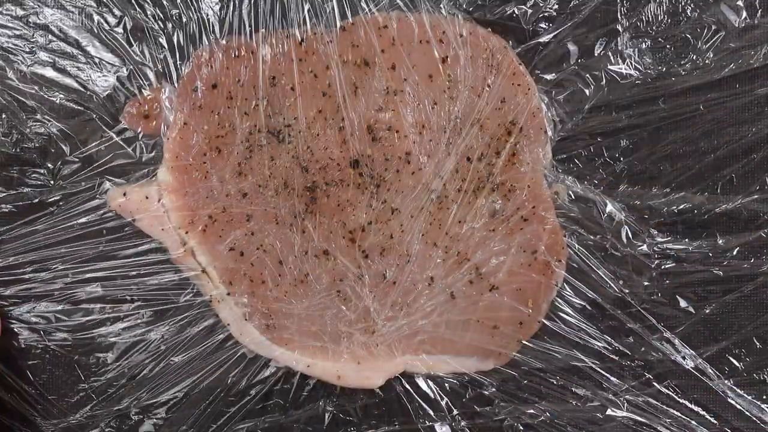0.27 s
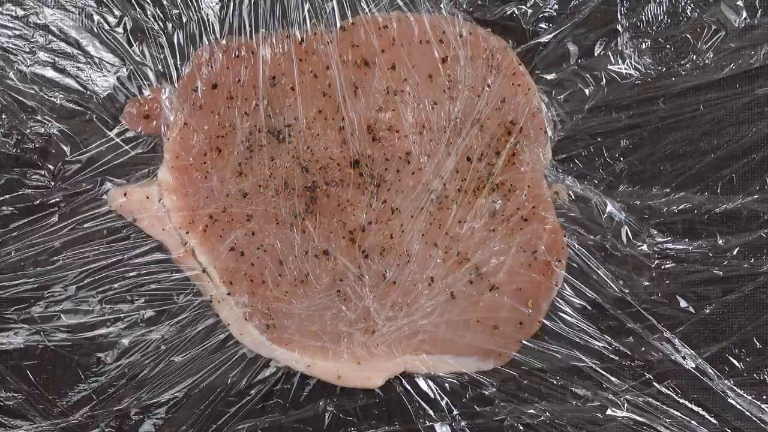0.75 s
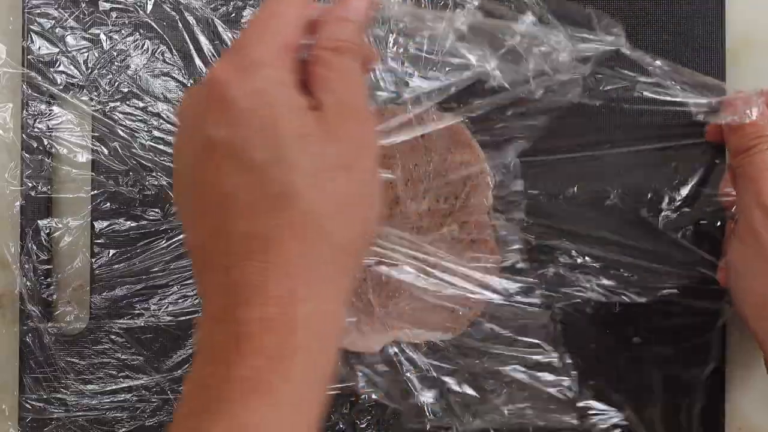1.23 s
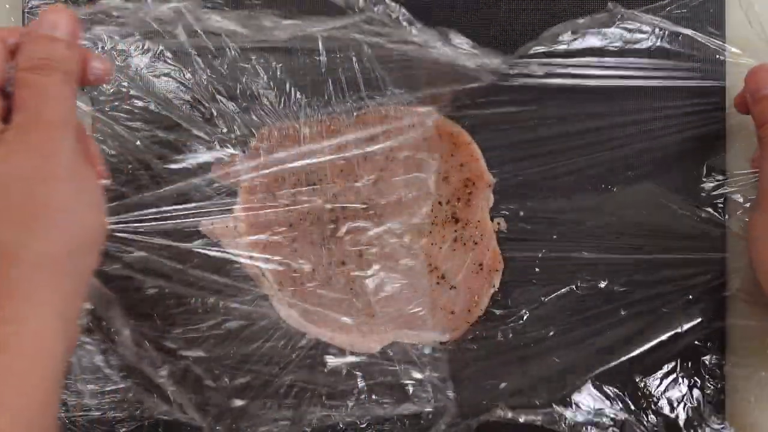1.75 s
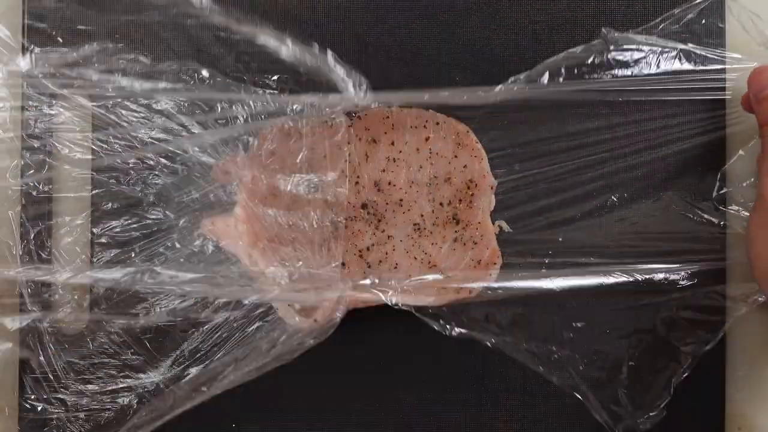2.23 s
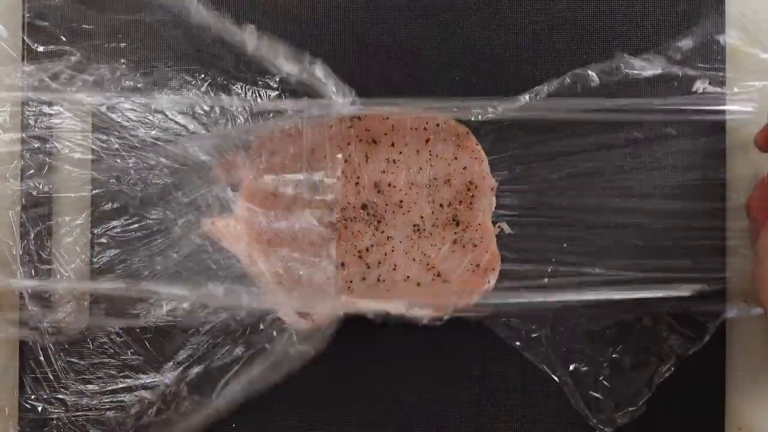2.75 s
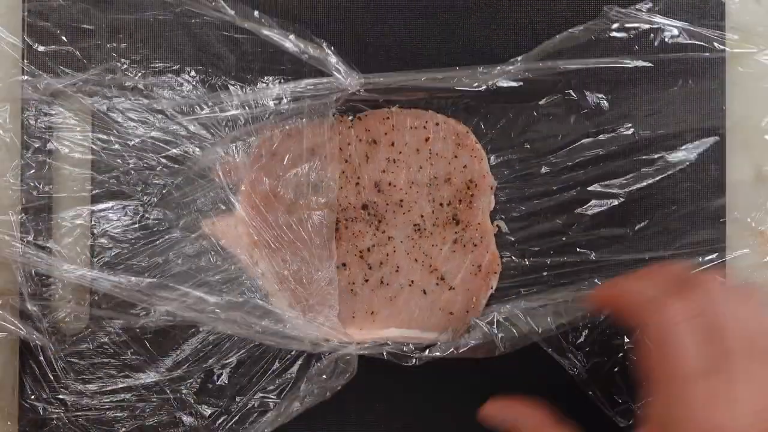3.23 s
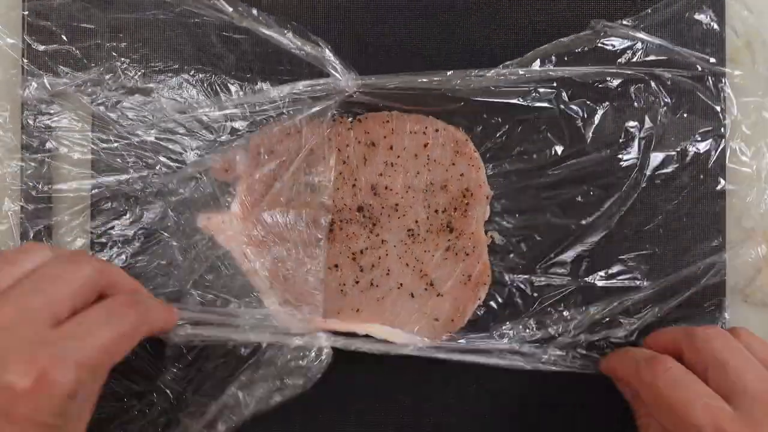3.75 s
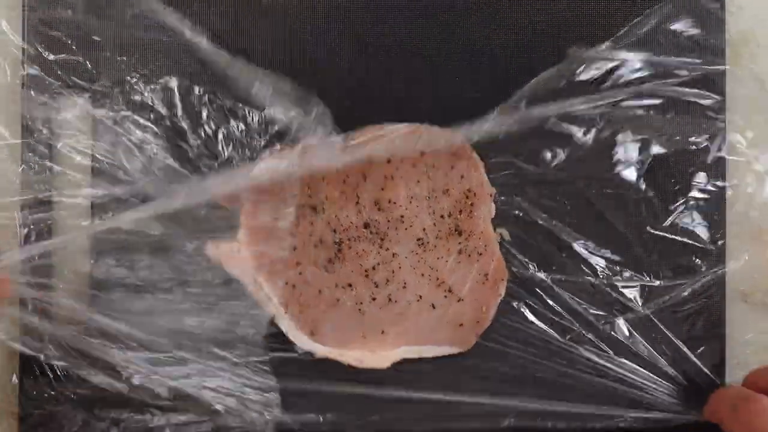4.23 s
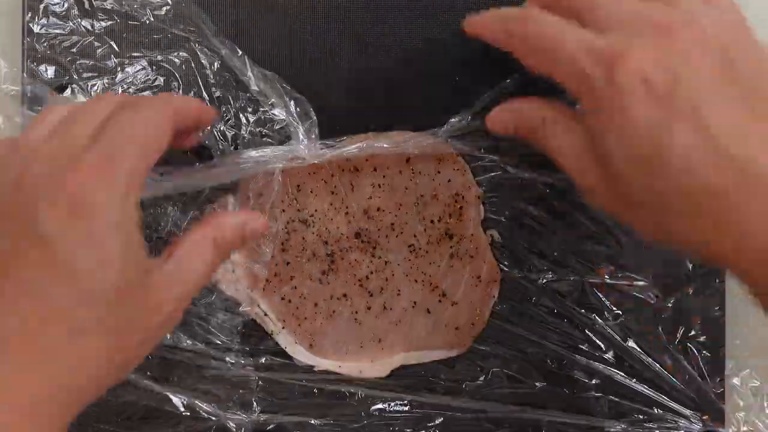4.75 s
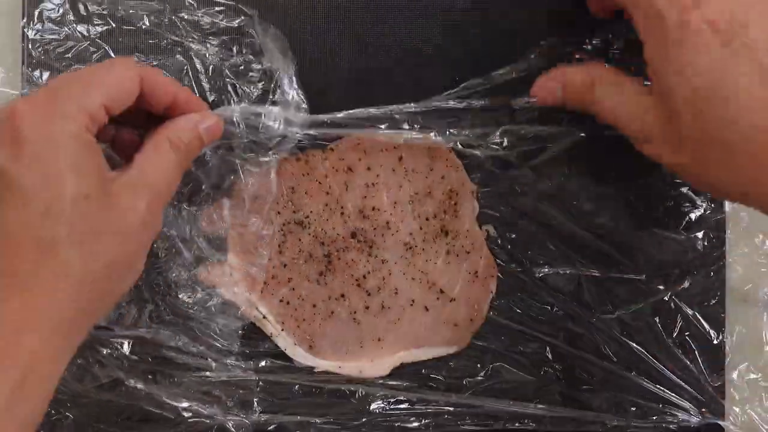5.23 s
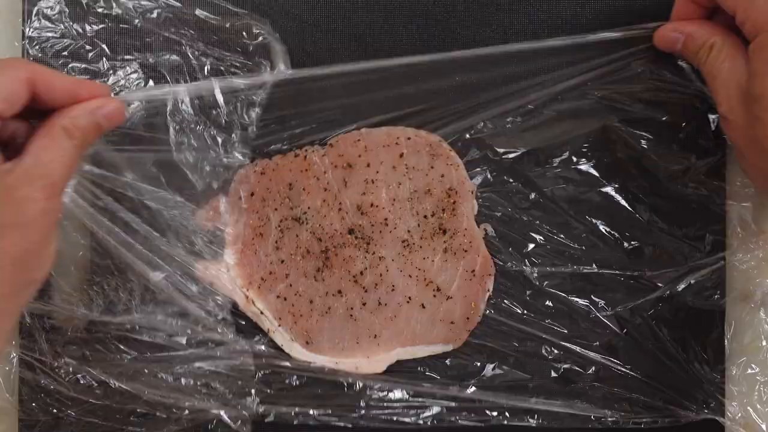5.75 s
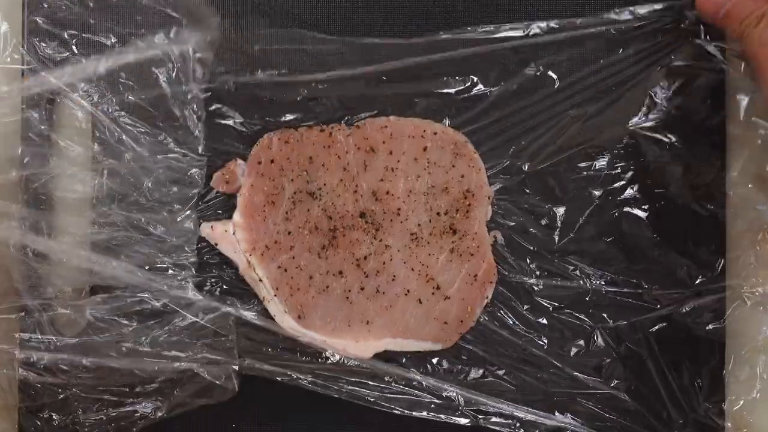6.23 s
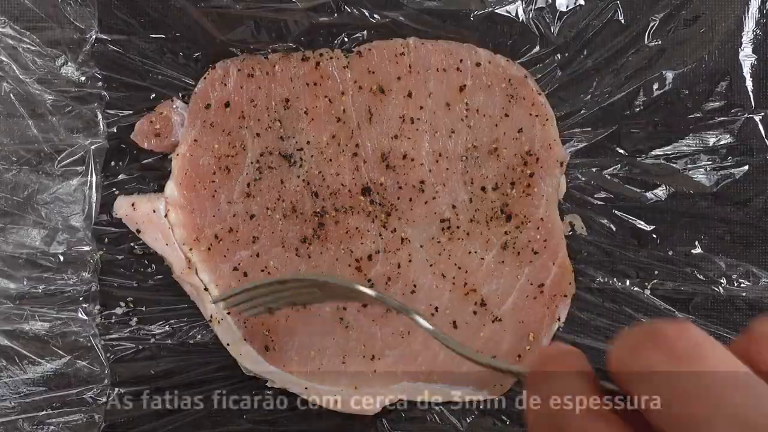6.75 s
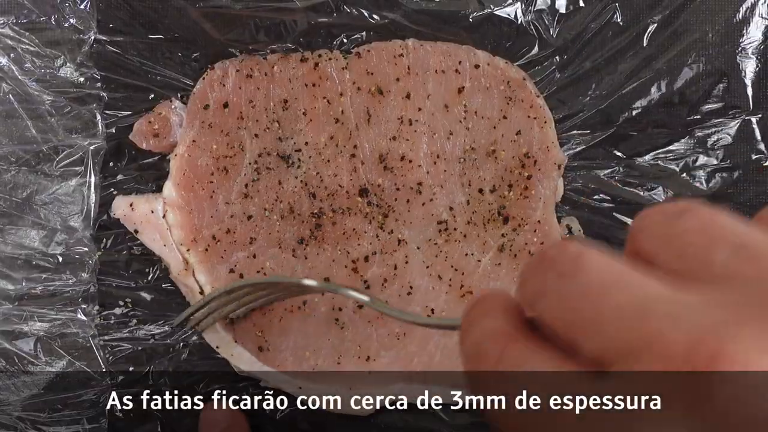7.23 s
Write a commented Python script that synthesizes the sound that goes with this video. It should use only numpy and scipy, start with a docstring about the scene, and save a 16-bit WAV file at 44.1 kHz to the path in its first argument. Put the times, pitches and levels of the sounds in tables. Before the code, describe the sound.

A dull mallet thud dies away on a kitchen board, then cling film is peeled off in three crackling, snapping pulls with brief fingertip squeaks.

```python
"""In a kitchen, a last mallet blow on a cutlet dies away as decaying modes of board and worktop.
Then two hands peel the cling film off the meat in three pulls: buckling creases crinkle and snap,
taut film lets go in ringing ticks, billows flap as coloured noise, and fingertips squeak by stick-slip.
At the end the film ticks faintly as a fork reaches the meat. Room hiss and an appliance hum lie beneath.
Almost everything sounds on the left; the right holds a faint, roomier copy."""
import sys
import numpy as np
from scipy import signal
from scipy.fft import rfft, irfft
from scipy.io import wavfile
from scipy.ndimage import uniform_filter1d

SR = 44100
rng = np.random.default_rng(int(sys.argv[2]) if len(sys.argv) > 2 else 0)


def int16_out(signal):
    """Quantize to a 16-bit WAV file."""
    q = np.round(np.clip(np.atleast_2d(signal).T, -1, 1) * 32767)
    wavfile.write(sys.argv[1], SR, q.astype(np.int16))


N = 329868
TIME = np.arange(N) / SR
STEPS = TIME[::64]   # slow controls are worked out at these times


def from_db(db):
    """Level to amplitude: 20 dB is a factor of ten."""
    return 10 ** (np.asarray(db) / 20)


def rms_one(x):
    """Normalisation of the mean power: scale to rms 1."""
    return x / np.sqrt(np.mean(x ** 2) + 1e-20)


def in_time(rows, t=TIME):
    """Linear interpolation: the columns of a curve at the times t."""
    s, *columns = np.transpose(rows)
    return [np.interp(t, s, c) for c in columns]


def at_hz(points, hz):
    """Logarithmic frequency scale: read a spectrum along it."""
    f, value = np.transpose(points)
    return np.interp(np.log(np.maximum(hz, 1)), np.log(f), value)


def cut(x, hz, kind, order=2):
    """Butterworth filtering: a maximally flat pass band."""
    edges = np.clip(hz, 10, .48 * SR)
    return signal.sosfilt(signal.butter(order, edges, kind, fs=SR, output="sos"), x + 1e-18)


def colour(x, spectrum, size=8192):
    """Minimum-phase filtering: the folded cepstrum gives a causal response with this spectrum."""
    gain = from_db(at_hz(spectrum, np.fft.rfftfreq(size, 1 / SR)))
    cepstrum = irfft(np.log(gain))
    cepstrum[1:size // 2] *= 2
    cepstrum[size // 2 + 1:] = 0
    response = irfft(np.exp(rfft(cepstrum)))
    return signal.fftconvolve(x, response)[:len(x)]


def noise(spectrum):
    """Coloured noise: white noise shaped by a filter, at rms 1."""
    return rms_one(colour(rng.standard_normal(N), spectrum))


def drift(rate):
    """Slow random modulation: joined normal values, rate of them per second."""
    knots = rng.standard_normal(8192)
    return np.interp(TIME * rate, np.arange(len(knots)), knots)


def even(x, span_s):
    """Level control: hold the short-term rms near 1, keeping faster detail."""
    width = max(int(span_s * SR), 2)
    power = uniform_filter1d(uniform_filter1d(x * x, width), width)
    return x / np.sqrt(np.abs(power) + 1e-14)


def ring(x, hz, width_hz):
    """Resonance: a two-pole filter with gain 1 at its peak."""
    r = np.exp(-np.pi * width_hz / SR)
    zeros = np.array([1, 0, -1]) * (1 - r * r) / 2
    poles = [1, -2 * r * np.cos(2 * np.pi * hz / SR), r * r]
    return signal.lfilter(zeros, poles, x + 1e-18)


def add(out, s, sound):
    """Superposition: mix a short sound in at time s."""
    i = int(np.clip(round(s * SR), 0, N - 1))
    out[i:i + len(sound)] += sound[:N - i]


def swell(start, length, rise_db_per_s, fall_db_per_s):
    """Exponential attack and release: straight slopes in dB below the held level."""
    before, after = np.maximum(start - STEPS, 0), np.maximum(STEPS - start - length, 0)
    return -np.minimum(rise_db_per_s * before + fall_db_per_s * after, 100)


# spectrum of the room hiss: (frequency [Hz], relative level [dB])
HISS_SPECTRUM = [(20, 9), (55, -2), (110, -7.5), (154, -11), (210, 2), (262, -8), (400, -13.5), (550, -17),
                 (950, -14), (1400, -27.5), (2500, -22.5), (4500, -15.5), (8000, -26), (16000, -32)]
# partials of a kitchen appliance: (frequency [Hz], relative level [dB])
APPLIANCE_HUM = [(48.4, -77), (212, -78), (318, -83), (369, -92), (435, -90.5)]


def room_tone():
    """Stationary noise and steady partials: faint hiss and a wavering appliance hum."""
    hum = 0
    for hz, db in APPLIANCE_HUM:
        partial = np.sqrt(2) * np.sin(2 * np.pi * hz * TIME + 0.37 * drift(25))
        hum = hum + from_db(db + 1.2 * drift(8.9)) * partial
    return from_db(-73.0) * noise(HISS_SPECTRUM) + hum


# reverberation time of the kitchen: (frequency [Hz], time to fall 60 dB [s])
REVERBERATION = [(100, 0.2), (500, 0.45), (2000, 0.38), (6000, 0.2), (15000, 0.083)]


def kitchen(x, size=30000):
    """Diffuse reverberation: decaying noise bands of unit total power, the treble dying faster."""
    t, tail = np.arange(size) / SR, 0
    edges = np.geomspace(60, 18000, 9)
    for low, high in zip(edges, edges[1:]):
        t60 = at_hz(REVERBERATION, np.sqrt(low * high))
        band = cut(rng.standard_normal(size), [low, high], "band")
        tail = tail + band * from_db(-60 * t / t60)
    tail = tail * np.minimum(t / 0.0027, 1)
    return signal.fftconvolve(x, tail / np.linalg.norm(tail))[:N]


def scatter(x, decay_s, size=600):
    """Early reflection: quick echoes off worktop and hands, of unit power, slowly wandering at random."""
    t, turn = np.arange(size) / SR, 2 * drift(22)
    echoes = rng.standard_normal((2, size)) * t * np.exp(-t / decay_s)
    one, other = (signal.oaconvolve(x, echo / np.linalg.norm(echo))[:N] for echo in echoes)
    return np.cos(turn) * one + np.sin(turn) * other


# modes of board and worktop: (frequency [Hz], relative level [dB], time to fall 60 dB [s])
BOARD_MODES = [(29, -26, 0.56), (67.7, -30, 0.94), (71.3, -29.5, 0.89), (123.2, -19.5, 0.2),
               (127.9, -21.5, 0.54), (158.4, -33.5, 0.39), (160.4, -31.5, 0.9), (204.5, -32, 0.66),
               (222.3, -29.5, 0.25), (258, -34, 0.2), (321, -42.5, 0.56), (475, -42.5, 0.33)]
# spectrum of the dull thud: (frequency [Hz], relative level [dB])
THUD_SPECTRUM = [(40, 1.5), (130, 5), (230, 2), (340, -17), (600, -7.5), (1050, -11), (1400, -24.5),
                 (2600, -29.5), (3500, -30.5), (4500, -28.5), (6000, -36), (15000, -51)]
# blows on the board, first the mallet, later a fingertip landing on the board:
# (time [s], relative strength [dB])
BOARD_BLOWS = [(0.0, -1), (5.302, -17.5)]


def blows():
    """Modal decay: the board's modes ring on, close ones beating, under a thud dying in the room."""
    modes = 0
    for k, (hz, db, t60) in enumerate(BOARD_MODES):
        level_db = db - 60 * TIME / t60 + 1.1 * drift(30)
        mode = np.sin(2 * np.pi * hz * TIME + .15 * drift(40))
        modes = modes + (-1) ** k * from_db(level_db) * mode
    out = np.zeros(N)
    for s, strength_db in BOARD_BLOWS:
        thud = even(noise(THUD_SPECTRUM), 0.03) * from_db(-28.0 - 60 * TIME / 0.55)
        onset = np.minimum(TIME / 0.00051, 1)
        add(out, s, from_db(strength_db) * (modes + thud) * onset)
    return out


# spectra of the pushed air and of the film dragging: (frequency [Hz], relative level [dB])
AIR_SPECTRUM = [(15, 5), (35, 1), (55, 2.5), (80, -3), (110, -4.5), (170, -27)]
DRAG_SPECTRUM = [(70, -1), (115, 1), (200, 2), (300, -5), (480, -4.5), (800, -25.5)]
# the sheet billows: (start [s], length [s], relative level of pushed air [dB],
# relative level of flapping and dragging on the board [dB])
SHEET_BILLOWS = [(1.281, 0.082, -39.5, -47), (1.474, 0.31, -39.5, -45), (2.046, 0.016, -39, -52),
                 (2.122, 0.067, -51, -53), (2.789, 0.028, -42.5, -56.5), (2.888, 0.18, -56.5, -64.5),
                 (3.5, 0.06, -46.5, -51), (3.695, 0.064, -67, -54.5), (4.005, 0.081, -44, -52),
                 (4.239, 0.074, -40.5, -49), (4.374, 0.094, -49, -65.5), (4.919, 0.036, -59, -70),
                 (5.085, 0.09, -81, -61), (5.32, 0.17, -55, -55), (5.59, 0.067, -47, -46.5),
                 (5.721, .22, -42.5, -47.5), (6.024, 0.017, -48, -57), (6.267, 0.024, -66, -64),
                 (6.401, 0.024, -44, -66), (6.525, 0.029, -54, -61.5), (6.68, 0.13, -72, -74.5)]
BILLOW_RISE_DB_PER_S, BILLOW_FALL_DB_PER_S = 257.5, 171.5
AIR_FOLLOWS_DB, DRAG_FOLLOWS_DB = -19.5, -14.5   # re the level of the wide folds


def sway(level_db):
    """Air displacement and friction: the sheet pushes air at the microphone, flaps and drags."""
    stir_db = np.interp(STEPS, TIME, level_db)
    air, drag = stir_db + AIR_FOLLOWS_DB, stir_db + DRAG_FOLLOWS_DB
    for start, length, air_db, drag_db in SHEET_BILLOWS:
        shape = swell(start, length, BILLOW_RISE_DB_PER_S, BILLOW_FALL_DB_PER_S)
        air, drag = np.maximum(air, air_db + shape), np.maximum(drag, drag_db + shape)
    pushed = np.interp(TIME, STEPS, from_db(air)) * even(noise(AIR_SPECTRUM), 0.032)
    dragged = np.interp(TIME, STEPS, from_db(drag - 1.5)) * even(noise(DRAG_SPECTRUM), 0.1)
    return pushed + dragged


def slip(hz, rasp_db, size=1000):
    """Stick-slip release: one slip is a rounded pulse that rings briefly, with a rasp of the film."""
    t = np.arange(size) / SR
    cycles = hz * t
    pulse = cut(-np.sin(2 * np.pi * cycles) * cycles ** 2 * np.exp(-cycles / 0.2), 1800, "low", order=8)
    pulse = cut(pulse, hz * hz / 2300, "high", order=4)   # a tighter contact has less body
    rasp = cut(rng.standard_normal(size) * np.exp(-t / 0.003), [2700, 4800], "band", order=3)
    rasp = rasp + 1.1 * ring(rasp, 4300, 600) + .5 * ring(rasp, 3100, 600)
    return pulse / np.abs(pulse).max() + from_db(rasp_db) * rasp / np.abs(rasp).max()


# strokes of the fingertips: (start [s], length [s], relative level [dB],
# hardest press [share of the length], slip rate at start [1/s], at end [1/s],
# ringing pitch at start [Hz], at end [Hz], unevenness [0-1])
FINGER_STROKES = [(3.181, .17, -57.5, 0.56, 160, 215, 145, 168, 0.18),
                  (3.36, .13, -44, 0.44, 500, 400, 1180, 1100, 0.12),
                  (3.486, .055, -35.5, 0.35, 210, 380, 940, 990, .18),
                  (4.917, .02, -37, .45, 200, 150, 880, 1120, 0.04),
                  (5.154, .042, -37.5, .52, 430, 590, 900, 1130, 0.15),
                  (5.242, .046, -30.5, 0, 390, 510, 880, 640, 0.13),
                  (5.3016, .005, -19, 0, 60, 60, 800, 800, 0),
                  (5.3088, .05, -25, 0.46, 230, 880, 680, 850, 0.04),
                  (6.221, .056, -43.5, 0.7, 170, 330, 780, 730, 0.15)]
SQUEAK_EASE_DB = 15   # how much softer a stroke is at its far end than at the hardest press


def squeaks():
    """Stick-slip friction: fingertips press and ease over film and board; a faster slip rate rasps more."""
    out = np.zeros(N)
    for (start, length, level_db, press, first_per_s, last_per_s,
         first_hz, last_hz, uneven) in FINGER_STROKES:
        part = 0   # share of the stroke done
        for late, strong in rng.standard_normal((90, 2)):
            if part > 1:
                break
            per_s = first_per_s + part * (last_per_s - first_per_s)
            hz = first_hz + part * (last_hz - first_hz)
            ease_db = SQUEAK_EASE_DB * ((part - press) / max(press, 1 - press)) ** 2
            gain = from_db(level_db - ease_db + 9.0 * uneven * strong)
            add(out, start + part * length - .0004, gain * slip(hz, rasp_db=-22 + per_s / 50))
            part += np.exp(uneven * late) / per_s / length
    # the board sings along
    return out + 1.0 * ring(out, 478, 35) + 0.54 * ring(out, 760, 30) + .5 * ring(out, 925, 30)


# taut film unzipping from the meat: (start [s], length [s], pitch at start [Hz],
# pitch at end [Hz], relative level [dB])
FILM_PEELS = [(0.522, 0.044, 3930, 4000, -60), (0.562, 0.019, 4470, 4300, -49.5),
              (0.924, 0.035, 960, 1150, -59.5), (0.958, 0.094, 2960, 2480, -48),
              (1.477, 0.037, 2900, 3200, -34.5), (3.754, 0.078, 1911, 1940, -44),
              (3.914, 0.086, 2190, 2100, -44.5), (3.997, 0.071, 2460, 1300, -40),
              (4.2, .06, 4350, 4040, -39), (5.601, 0.038, 2537, 2700, -42.5),
              (6.676, 0.05, 6000, 4980, -66), (6.829, 0.023, 1050, 1015, -72.5)]


def peels(size=500):
    """Vibration of a free span: stretched film lets go in a quick run of ticks at the span's pitch."""
    out, t = np.zeros(N), np.arange(size) / SR
    for start, length, first_hz, last_hz, level_db in FILM_PEELS:
        run = np.zeros(int(length * SR) + size)
        for part in rng.beta(2, 2, int(1200 * length)):   # densest in mid-run
            hz = first_hz * (last_hz / first_hz) ** part * np.exp(0.083 * rng.standard_normal())
            cycles = t * hz
            tick = np.sin(2 * np.pi * cycles) * cycles * np.exp(-cycles / .6)
            add(run, part * length, from_db(1.2 * rng.standard_normal()) * tick)
        add(out, start, from_db(level_db - 1.5) * rms_one(run))
    return out


def crease(hz, shiver_db, shiver_s, size=700):
    """Buckling: a fold gives one sharp, heavily damped spike, then the sheet around it shivers."""
    t = np.arange(size) / SR
    shiver = rng.standard_normal(size) * np.exp(-t / shiver_s) / (1 + t / 0.0054)
    push = from_db(shiver_db) * shiver / np.linalg.norm(shiver)
    push[0] = -1
    return ring(push, min(hz, 15000), 1.0 * hz) + 0.38 * cut(push, 920, "high", order=1)


# single snaps of the film, loud and faint, the last ones ticks under the fork:
# (time [s], relative peak level [dB], brightness [Hz])
SINGLE_SNAPS = [(0.506, -39, 6500), (0.5898, -26.5, 4200), (0.9674, -22, 3180), (1.0197, -19, 3200),
                (1.1482, -20, 3460), (1.1688, -18, 5000), (1.2015, -21, 2590), (1.2331, -18, 4930),
                (1.4122, -27, 4700), (1.5013, -14.5, 5470), (1.509, -11, 4280), (1.3467, -11, 4200),
                (1.367, -12, 4960), (1.406, -13.5, 4450), (1.443, -11, 4230), (1.472, -16, 4300),
                (1.5049, -5.5, 3900), (1.557, -13.5, 4430), (1.6447, -11, 3200), (1.729, -8.5, 6500),
                (1.8227, -13, 3200), (1.8366, -15, 5800), (1.8422, -9.5, 3970), (2.1635, -18.5, 7400),
                (2.7555, -35, 6000), (2.9092, -32, 8000), (2.981, -34.5, 2500), (3.1566, -35.5, 6300),
                (3.288, -52.5, 11000), (3.6246, -21.5, 9600), (3.7736, -12, 10100), (3.7878, -19, 6200),
                (3.803, -15.5, 6630), (3.95, -15, 10340), (3.9744, -13.5, 4000), (4.0343, -14, 2800),
                (4.2223, -9.5, 4570), (4.2296, -11.5, 5440), (4.3504, -10.5, 6160), (5.0068, -28, 7320),
                (5.3005, -29, 2310), (5.448, -13, 6650), (5.514, -14, 4480), (5.583, -11.5, 5200),
                (5.588, -11, 4800), (5.63, -14, 3980), (5.6693, -5, 5500), (5.678, -13.5, 5330),
                (5.75, -13.5, 8130), (5.8022, -11, 7330), (5.8326, -13.5, 8100), (5.7175, -12, 6900),
                (5.8082, -7.5, 6460), (5.8206, -7, 5850), (5.8775, -9.5, 6900), (5.8951, -13, 8200),
                (6.108, -25.5, 6700), (6.1612, -21, 6100), (6.4107, -17.5, 7400), (7.064, -44, 10000),
                (7.1044, -39, 10200), (7.2545, -41.5, 11700), (7.279, -41.5, 11700), (7.3883, -47, 7600),
                (7.464, -30.5, 9400)]
SNAPPING_ABOVE_DB = -46   # level of the crinkling from which further snaps come at random
RANDOM_SNAPS_PER_S, RANDOM_SNAP_HZ = 28, 6500   # mean rate then; middle of an octave of brightness
RANDOM_SNAP_DB = 12   # mean peak re the level of the crinkling
SNAP_SHIVER_DB, SNAP_SHIVER_S = -3, .0016   # the sheet shivering after a snap


def one_snap(hz, peak_db):
    """Buckling of one crease, set to a peak level."""
    snap = crease(hz, SNAP_SHIVER_DB, SNAP_SHIVER_S)
    return from_db(peak_db) * snap / np.abs(snap).max()


def snaps(level_db, count=2):
    """Snap-through instability: single creases flip, loud or faint, smaller folds giving way around each."""
    chance = rng.random((400, 4))
    share = RANDOM_SNAPS_PER_S * N / SR / len(chance)
    at_random = []
    for when, big, high, happens in chance:
        level = level_db[int(when * N)]
        if happens < share and level > SNAPPING_ABOVE_DB:
            peak_db = level + RANDOM_SNAP_DB + 8 * (big - .5)
            at_random.append((when * N / SR, peak_db, RANDOM_SNAP_HZ * 2 ** (high - .5)))
    out = np.zeros(N)
    for s, peak_db, hz in SINGLE_SNAPS + at_random:
        add(out, s, one_snap(0.72 * hz, peak_db))
        for late, strong, bright in rng.standard_normal((count, 3)):
            small = one_snap(hz * np.exp(0.37 * bright), peak_db - 12.0 + 2 * strong)
            add(out, s + 0.0018 * late, small)
    return out


# the hands pull the film off the meat, one curve a pull:
# (time [s], relative level of the crinkling [dB], brightness [dB])
HAND_PULLS = [
    [(0.70, -79.5, -5.5), (0.93, -52.5, -2), (1.03, -49.5, -0.5), (1.075, -51, -2), (1.2, -40, -3),
     (1.27, -43.5, -3), (1.4, -42.5, -4.5), (1.5, -36, -3), (1.79, -46, -7.5), (1.94, -49, 6),
     (2.18, -42.5, 0), (2.26, -59, 6)],
    [(3.45, -68, -10), (3.56, -45.5, 4), (3.62, -47, 5.5), (3.69, -41.5, 6.5), (3.78, -43, 13.5),
     (3.87, -46, 0.5), (4.05, -41, 5), (4.17, -46.5, 5), (4.25, -35, 3.5), (4.46, -60, 3.5),
     (4.53, -73.5, -4)],
    [(5.31, -56, -12.5), (5.44, -45.5, 2), (5.51, -43.5, 3), (5.59, -35, -2.5), (5.67, -40, 0.5),
     (5.82, -36, -2), (6.04, -41, 5.5), (6.13, -61, 8)],
]
# short rustles as the film is gripped, dropped or settles:
# (start [s], length [s], relative level [dB], brightness [dB])
SHORT_RUSTLES = [(0.527, 0.024, -65.5, 10), (2.034, 0.008, -40, -6), (2.29, .19, -61, 2),
                 (2.521, 0.25, -64.5, 3), (2.782, 0.019, -44.5, -1.5), (2.853, 0.055, -64, 4.5),
                 (2.988, 0.059, -54.5, 0), (3.14, 0.018, -68, -3), (3.217, .08, -84, 30),
                 (3.368, 0.034, -67, -1), (4.767, 0.1, -75.5, -3), (4.902, 0.087, -53.5, 2),
                 (5.064, 0.03, -59, 1), (5.155, 0.097, -61, -7.5), (6.226, 0.11, -61.5, -2.5),
                 (6.401, 0.015, -45, 2.5), (6.48, 0.089, -59.5, -1), (6.68, 0.021, -74, 14),
                 (6.922, 0.025, -72.5, 0), (7.085, 0.086, -70.5, 13), (7.241, 0.068, -74, 28),
                 (7.468, 0.025, -54.5, 13)]
RISE_DB_PER_S, FALL_DB_PER_S = 331, 237


def handling():
    """Addition of power: pulls and rustles join into one level and one brightness over time, in dB."""
    moves = [(pull[0][0], pull[-1][0] - pull[0][0], *in_time(pull, STEPS)) for pull in HAND_PULLS]
    power, bright = 0, 0
    for start, length, level_db, bright_db in moves + SHORT_RUSTLES:
        part = from_db(level_db + swell(start, length, RISE_DB_PER_S, FALL_DB_PER_S)) ** 2
        power, bright = power + part, bright + part * bright_db
    level_db = np.interp(TIME, STEPS, 10 * np.log10(power))
    return level_db, np.interp(TIME, STEPS, bright / power)


# spectrum of the crinkling sheet before its bands are levelled: (frequency [Hz], relative level [dB])
SHEET_SPECTRUM = [(240, -23.5), (400, 0), (719, 1), (814, -1), (1180, -1), (1270, -1), (2840, -3.5),
                  (4110, -1), (6050, -4), (6950, -3), (10500, -3), (14600, -3.5), (16000, -30.5)]
WIDE_FOLDS_DB, FINE_CREASES_DB = -6, -2   # re the middle band, at brightness 0
FINE_PER_BRIGHTNESS = .45   # brightness takes from the wide folds, gives this share to the fine creases


def crinkle(level_db, bright_db, kinds=16):
    """Crackling noise: countless creases buckle in clusters, finely when slack, in all sizes when pulled."""
    wide_db = WIDE_FOLDS_DB - bright_db
    fine_db = FINE_CREASES_DB + FINE_PER_BRIGHTNESS * bright_db
    per_s = 1200 * from_db(.25 * (level_db + 40) + 4.5 * drift(110))
    spread_db = np.interp(level_db, [-60, -40], [4.6, 6])
    buckles = rng.random(N) < per_s / SR
    sizes = from_db(spread_db * np.minimum(rng.exponential(1, N), 3.8)) * buckles
    dealt = rng.integers(0, kinds, N)   # each crease gets one of the shapes
    folds = 0
    for k, hz in enumerate(np.geomspace(1000, 14000, kinds)):
        shape = crease(hz, shiver_db=-3, shiver_s=.004) * (hz / 4000) ** -.35
        folds = folds + signal.oaconvolve(sizes * (dealt == k), shape)[:N]
    # film sliding on film adds a smooth hiss between the creases
    hiss = from_db(-5.5) * rng.standard_normal(N)
    sheet = colour(even(folds, .06) + hiss, SHEET_SPECTRUM)
    wide = even(cut(sheet, [560, 2450], "band", order=3), 0.27) * from_db(wide_db + 2.1 * drift(70))
    middle = even(cut(sheet, [2500, 7000], "band", order=3), 0.07)
    fine = even(cut(sheet, 8500, "high", order=3), 0.11) * from_db(fine_db + 0.61 * drift(90))
    return from_db(level_db - 2.0) * (wide + middle + fine)


def scene():
    """Superposition of all sources: direct on the left, a faint, roomier copy on the right."""
    level_db, bright_db = handling()
    fingers, board, still = squeaks(), blows(), room_tone()
    air = sway(level_db - bright_db)   # less brightness means wider folds, which stir more
    film = crinkle(level_db, bright_db) + peels() + snaps(level_db)
    sent = from_db(-10.5) * film + from_db(-12.0) * fingers   # excites the room
    left = film + fingers + air + board + still + kitchen(sent)
    right = from_db(-21.5) * (cut(film, 14000, "low", order=1) + fingers)
    right = right + from_db(-26.0) * air + from_db(-23.0) * board + from_db(-20.0) * still
    right = right + from_db(-24) * scatter(cut(film, 3500, "high", order=1), decay_s=.0008)
    right = right + from_db(-23.5) * kitchen(sent + from_db(-20.5) * (air + board))
    return from_db(6.0) * np.array([left, right])


def record(dry):
    """Band limiting: an elliptic low-pass cuts the top steeply at 16.2 kHz."""
    return signal.sosfilt(signal.ellip(12, .1, 80, 16200, fs=SR, output="sos"), dry)


dry = scene()
out = record(dry)
int16_out(out)
```